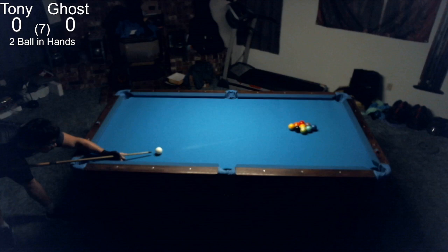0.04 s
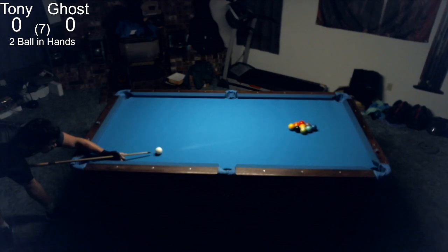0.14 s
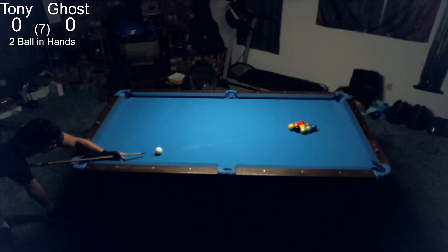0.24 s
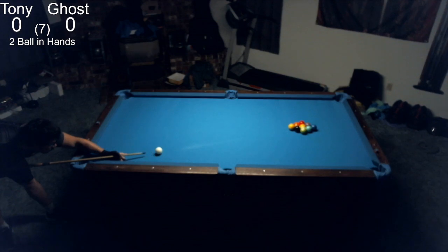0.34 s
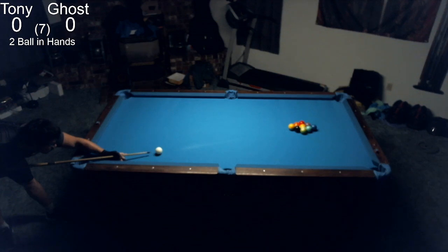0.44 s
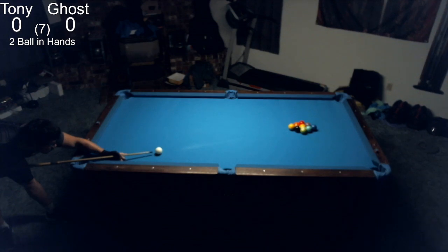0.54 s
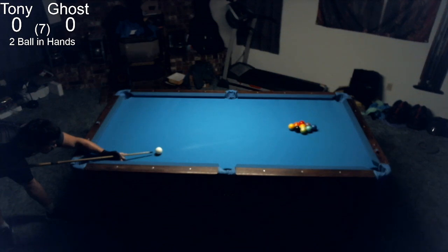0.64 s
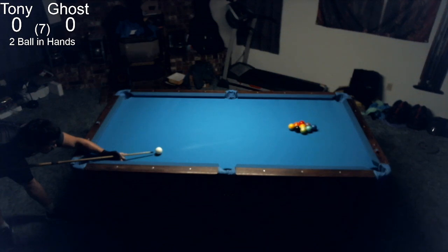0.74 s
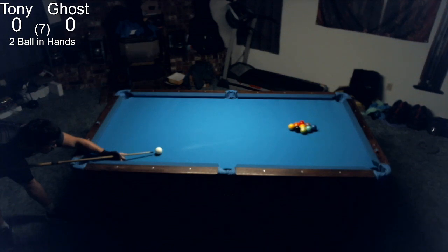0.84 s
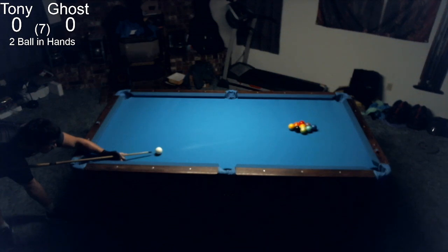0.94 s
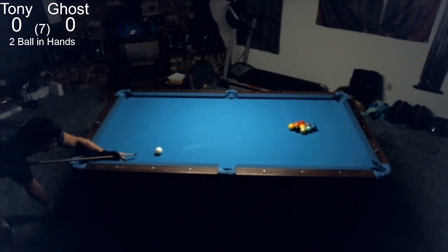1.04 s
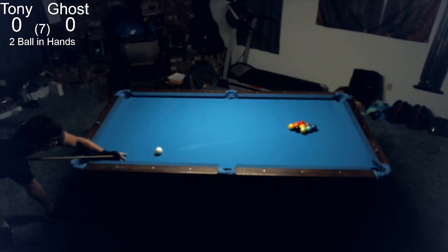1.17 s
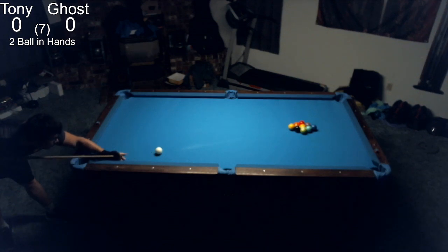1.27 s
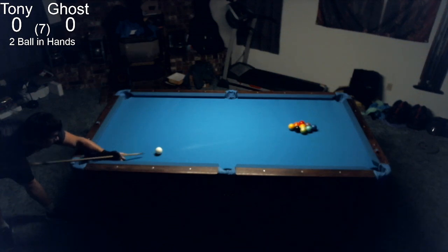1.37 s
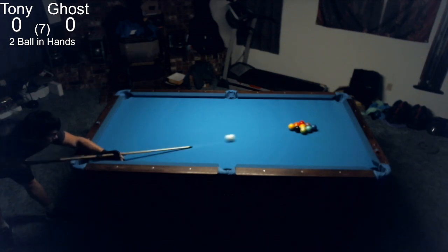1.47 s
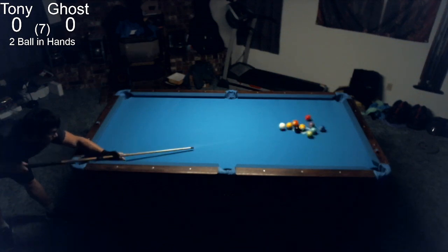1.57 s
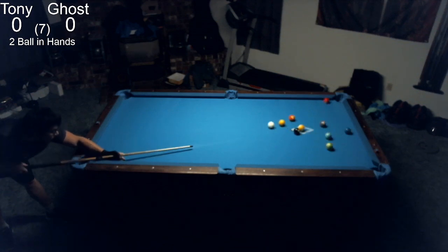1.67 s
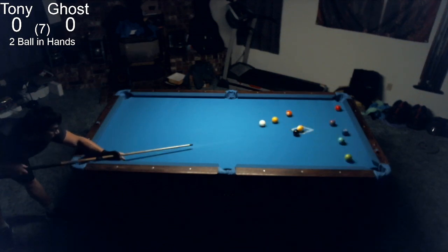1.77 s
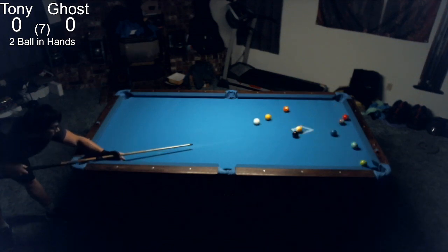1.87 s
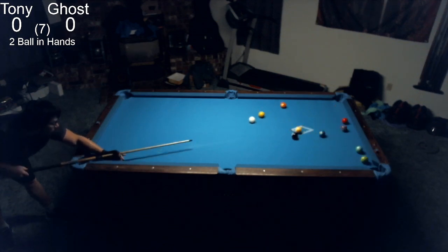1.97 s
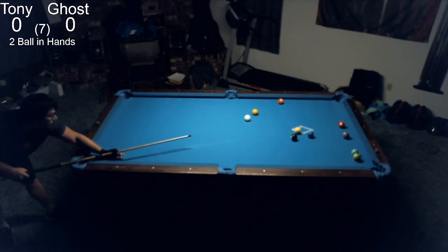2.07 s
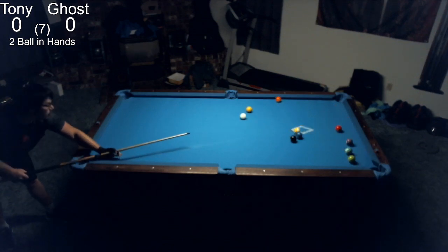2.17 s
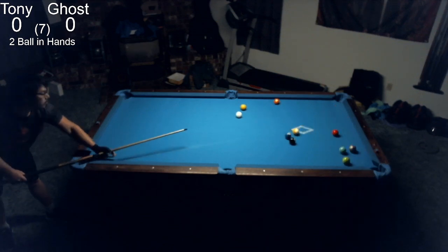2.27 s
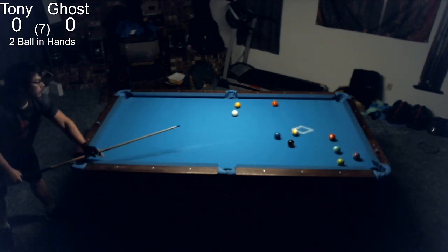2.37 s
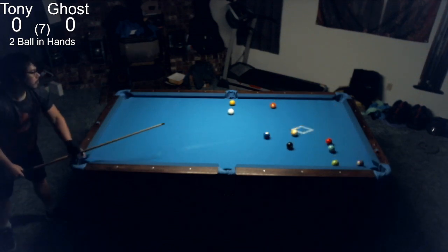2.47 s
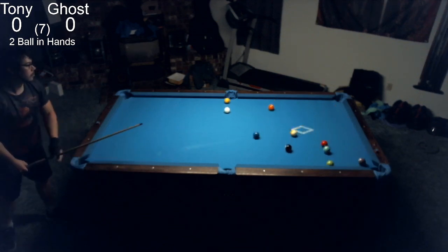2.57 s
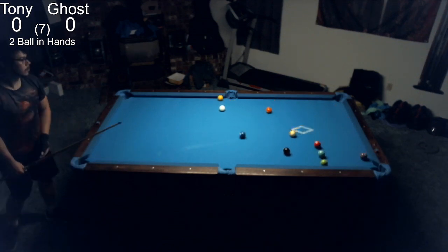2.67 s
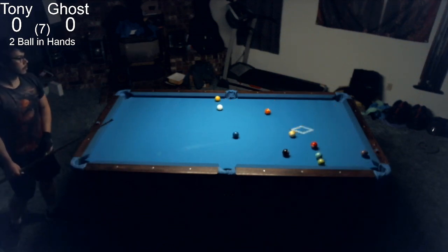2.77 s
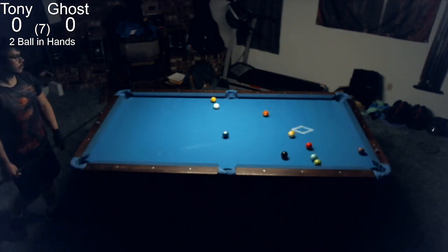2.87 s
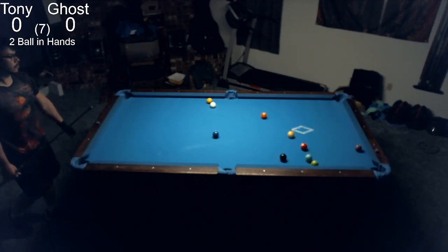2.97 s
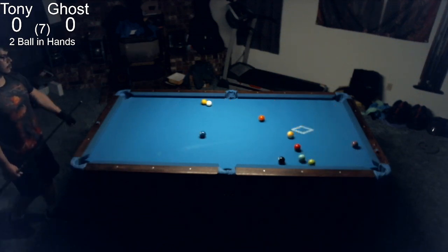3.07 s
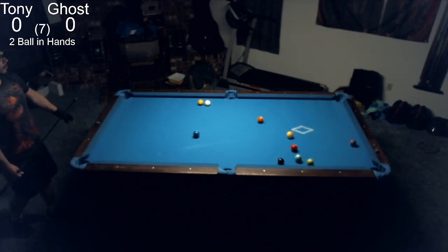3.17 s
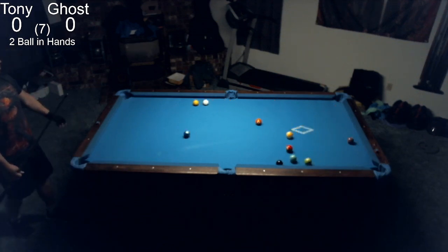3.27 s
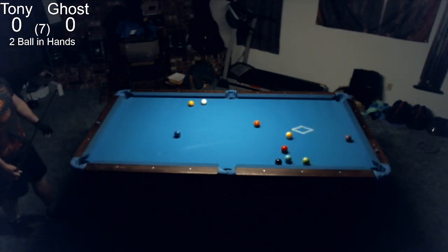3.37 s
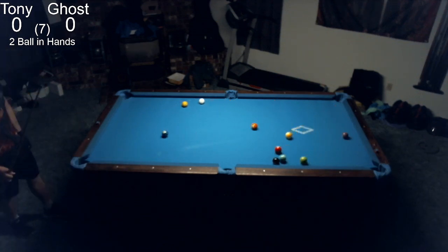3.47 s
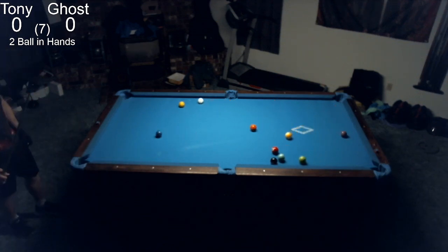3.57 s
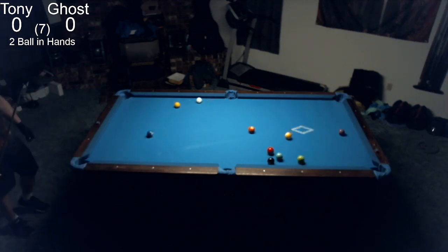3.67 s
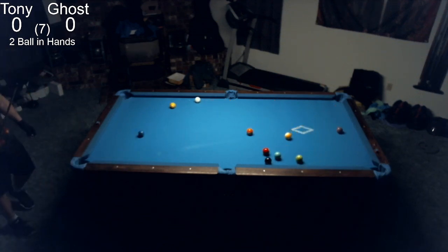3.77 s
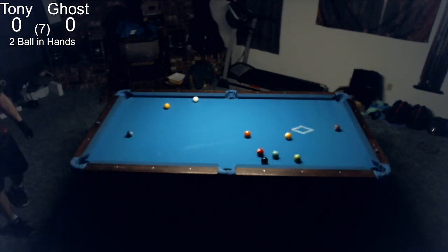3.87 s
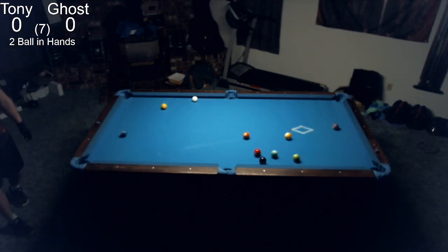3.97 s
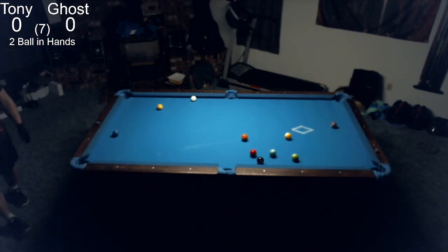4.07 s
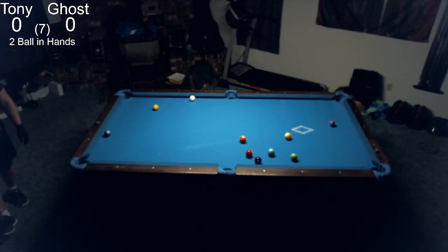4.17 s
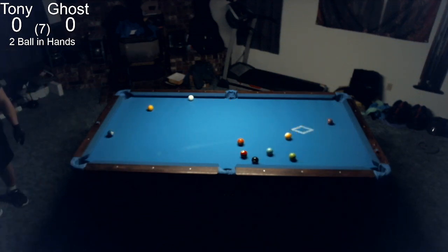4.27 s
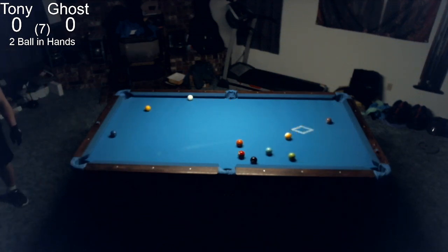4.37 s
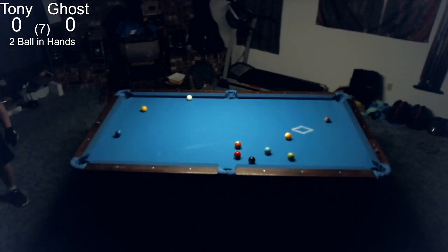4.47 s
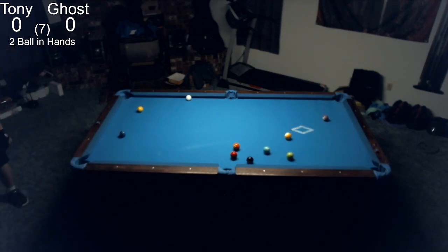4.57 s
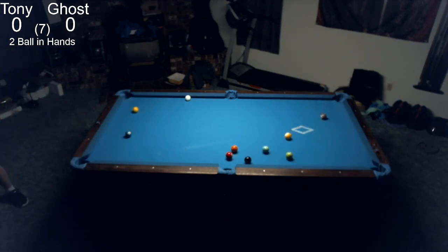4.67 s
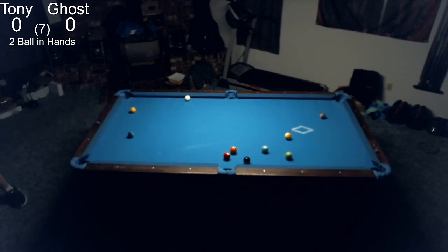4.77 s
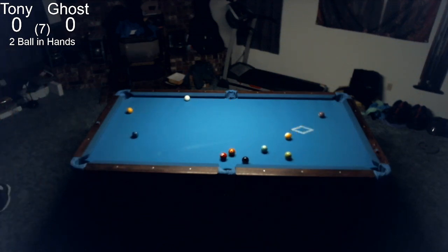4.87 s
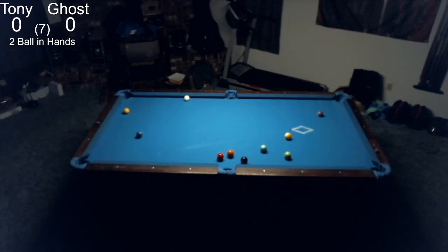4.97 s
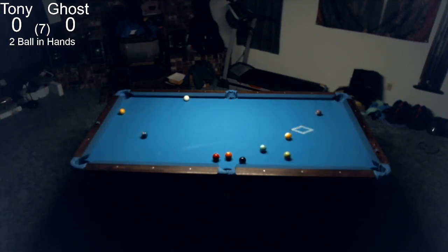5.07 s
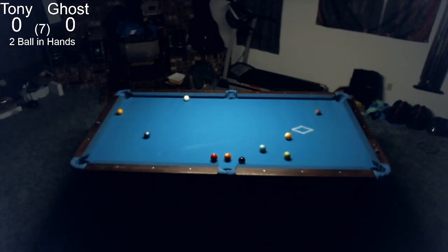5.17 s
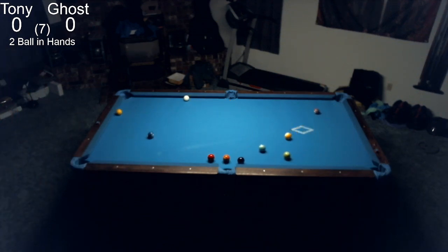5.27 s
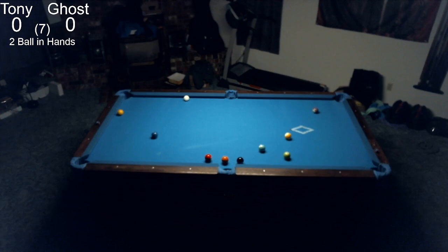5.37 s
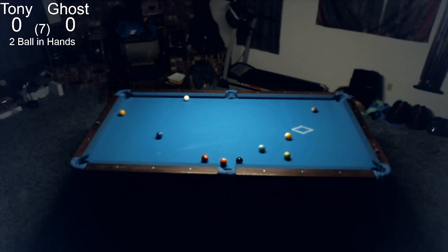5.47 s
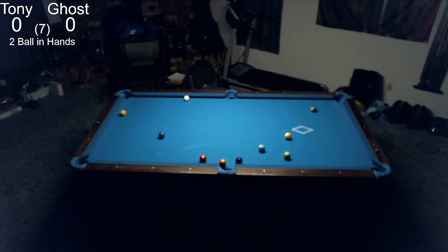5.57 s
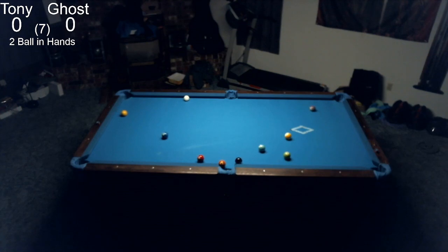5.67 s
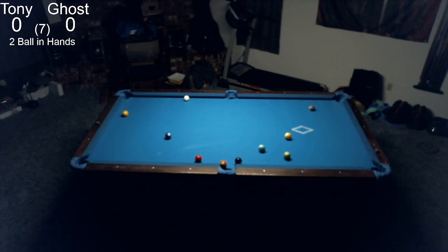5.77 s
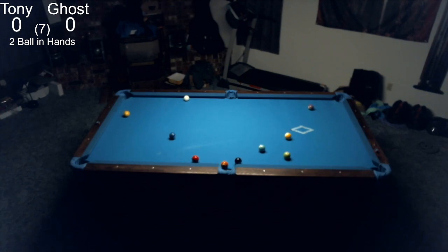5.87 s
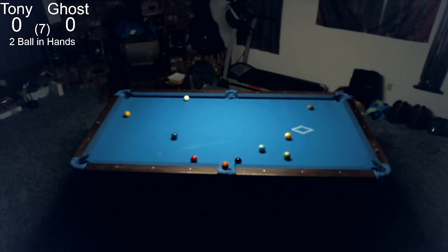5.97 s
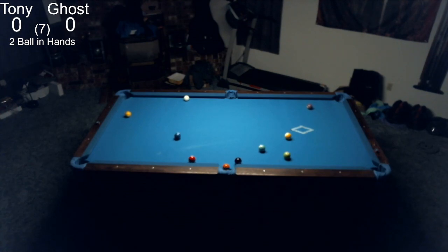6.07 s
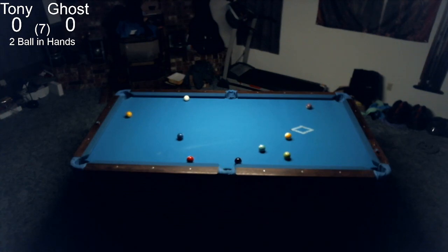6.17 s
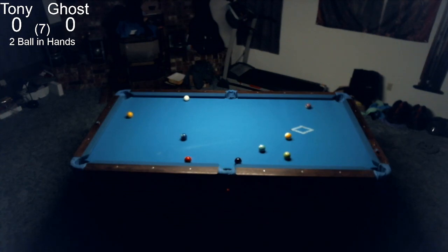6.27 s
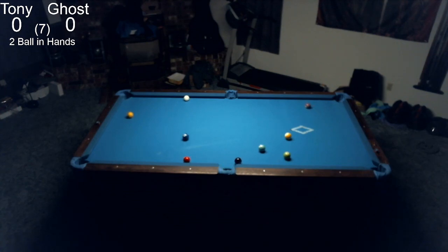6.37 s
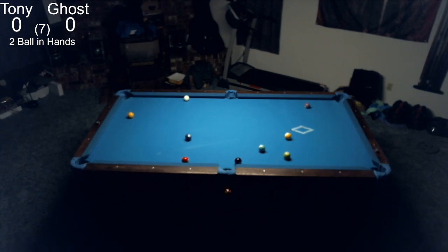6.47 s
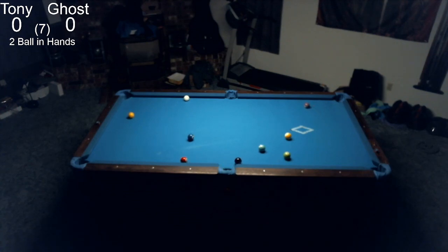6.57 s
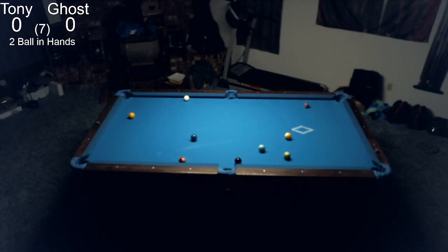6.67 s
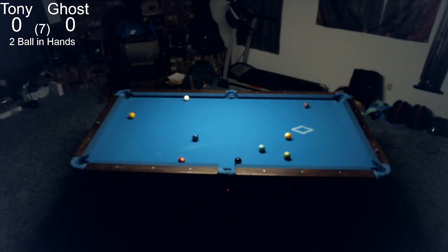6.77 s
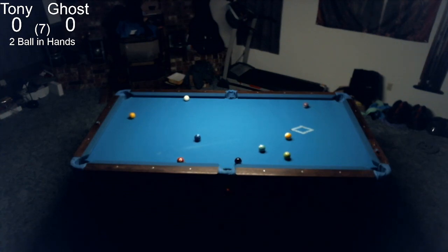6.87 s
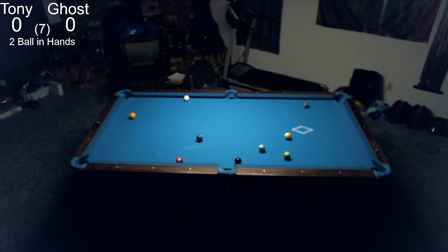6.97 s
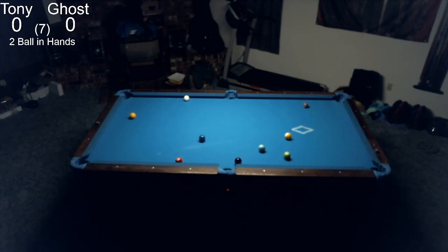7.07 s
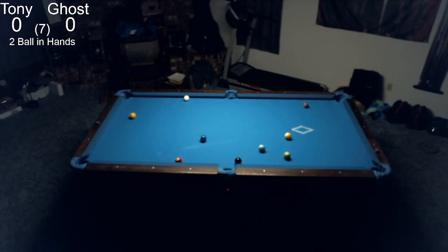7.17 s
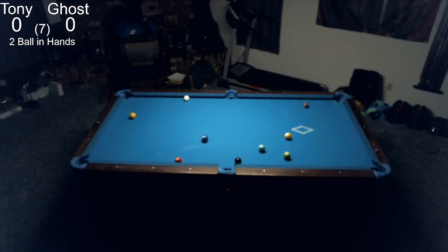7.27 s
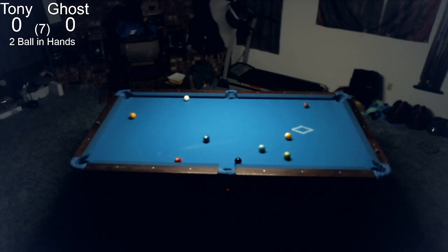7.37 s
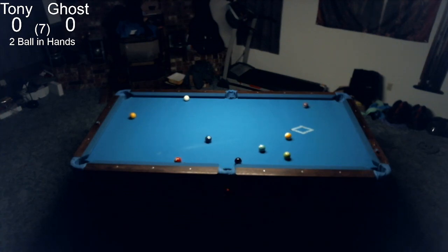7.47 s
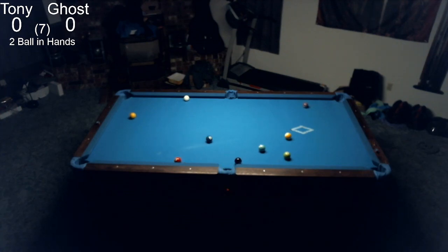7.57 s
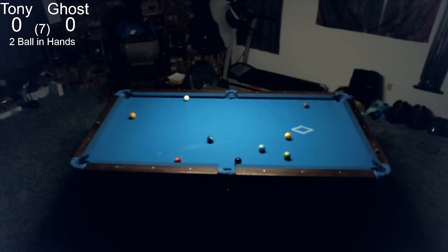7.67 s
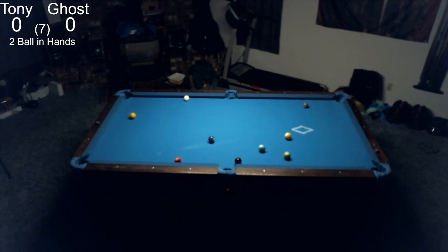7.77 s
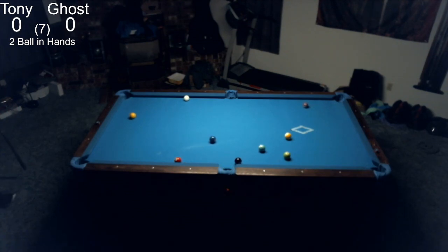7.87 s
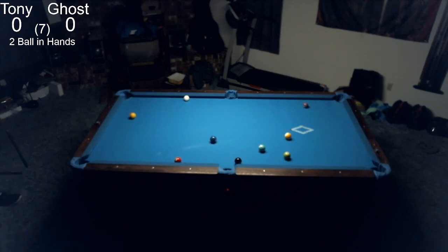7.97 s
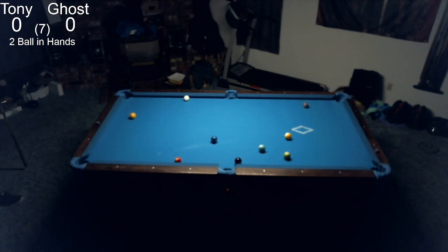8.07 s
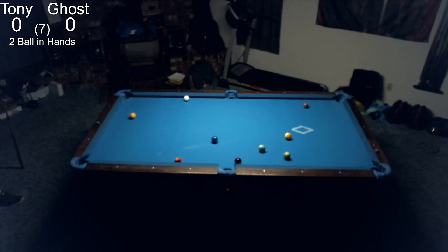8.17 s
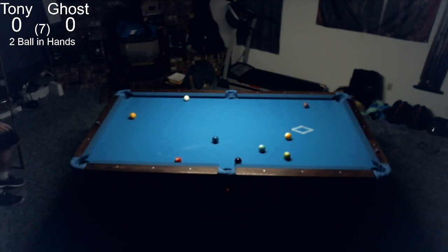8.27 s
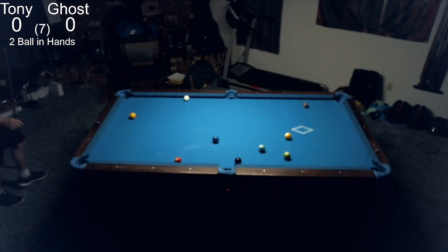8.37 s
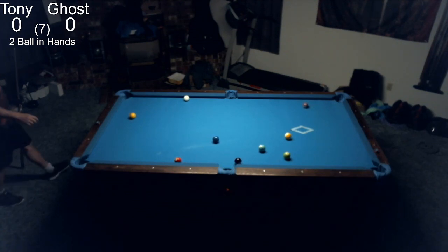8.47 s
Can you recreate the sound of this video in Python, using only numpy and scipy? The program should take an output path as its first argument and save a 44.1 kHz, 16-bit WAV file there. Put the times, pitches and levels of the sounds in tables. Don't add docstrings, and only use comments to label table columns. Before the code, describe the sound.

Faint mains hum and hiss in a quiet room, then a cue tip cracks on the ball with a brief shaft ring. An instant later the rack bursts, clipping the microphone, with a short slap off the walls. Cushions thud softly, ball clicks thin out, and after a pause one ball scrapes, rolls, knocks and rattles down into a pocket.

```python
import sys
import numpy as np
from scipy import signal
from scipy.fft import rfft, irfft, next_fast_len
from scipy.io import wavfile
from scipy.ndimage import uniform_filter1d

SR = 44100
rng = np.random.default_rng(int(sys.argv[2]) if len(sys.argv) > 2 else 0)


def unload_wav(signal):
    wavfile.write(
        sys.argv[1],
        SR,
        np.round(np.clip(np.atleast_2d(signal).T, -1, 1) * 32767).astype(np.int16),
    )


def linear_from_db(decibels):
    return 10 ** (np.asarray(decibels, float) / 20)


N = 375732

SIZE = 32768
HZ, T = np.fft.rfftfreq(SIZE, 1 / SR), np.arange(SIZE) / SR


def evened(x):
    return x / np.sqrt(np.mean(x ** 2) + 1e-20)


def read(points, hz):
    point_hz, value = np.transpose(points)
    return np.interp(np.log(hz + 1), np.log(point_hz + 1), value)


def coloured(x, points):
    hz = abs(np.fft.fftfreq(len(x), 1 / SR))
    log_gain = np.log(linear_from_db(read(points, hz)))
    response = np.exp(np.conj(signal.hilbert(log_gain)))
    return np.fft.ifft(np.fft.fft(x) * response).real


def add(mix, start_s, sound):
    fade = np.clip((T[-1] - T) / .1 - 1, 0, 1)
    part = mix[round(start_s * SR):][:len(sound)]
    part += (sound * fade)[:len(part)]


def pulse(hz, steep, fall=2):
    ratio = HZ / hz
    level = ratio ** steep * np.exp(-steep / fall * ratio ** fall)
    shape = -level * np.exp(-2j * np.pi * ratio * (1 + steep / 8))
    return shape / abs(irfft(shape, SIZE)).max()


# pitch_hz, time_to_fall_60_db_s
ROOM_DECAY = [(200, .5), (700, 0.39), (1500, .33), (3000, 0.3), (5000, .27), (7000, .22)]


def room(spectrum, slap_ms=22, slap=1.2, spread_ms=5, build_ms=3):
    taps = np.zeros(SIZE)
    at = np.arange(40, SIZE - 16, 16)
    taps[at + rng.integers(0, 16, len(at))] = rng.standard_normal(len(at))
    ms = T * 1000
    taps *= 1 - np.exp(-ms / build_ms)
    taps *= 1 + slap * np.exp(-((ms - slap_ms) / spread_ms) ** 2)
    reflections, tail = rfft(taps), 0
    for k, (_, t60) in enumerate(ROOM_DECAY):
        band = read([(hz, j == k) for j, (hz, _) in enumerate(ROOM_DECAY)], HZ)
        tail = tail + irfft(reflections * band, SIZE) * linear_from_db(-60 * T / t60)
    return irfft(rfft(tail / np.linalg.norm(tail)) * spectrum, SIZE)


def heard(spectrum, room_db, slap_ms, slap=0.6867):
    slate_db, slate_ms, small_hz = -2, 2.0924, 780
    spectrum = spectrum / (1 + (small_hz / (HZ + 1)) ** 7)
    slate_echo = linear_from_db(slate_db) * np.exp(-2j * np.pi * HZ * slate_ms / 1000)
    return irfft(spectrum * (1 + slate_echo), SIZE) + linear_from_db(room_db) * room(spectrum, slap_ms, slap)


# multiple_of_mains, rms_level_db
HUM_OVERTONES = [(1, -69), (2, -91.5), (3, -98.5), (4, -98), (5.15, -94.5), (7, -93), (9, -92), (10, -102),
                 (11, -92.5), (13, -100), (21, -99), (23, -105), (33, -103)]
# pitch_hz, level_db
HISS_COLOUR = [(30, -5.5), (90, -1), (200, -4), (330, 1.5), (400, -5), (1100, -5), (2500, -11.5),
               (5000, -10), (6500, -15.5)]


def hum_and_hiss():
    mains_hz, hiss_db = 60, -80
    t = np.arange(N) / SR
    hum = np.zeros(N)
    for multiple, db in HUM_OVERTONES:
        turns = multiple * mains_hz * t + rng.random() / (2 * np.pi)
        hum += np.sqrt(2) * linear_from_db(db) * np.sin(2 * np.pi * turns)
    hiss = evened(coloured(rng.standard_normal(next_fast_len(N)), HISS_COLOUR))[:N]
    return hum + linear_from_db(hiss_db) * hiss


def thud(db, hz, room_db):
    push = linear_from_db(db) * pulse(hz, 4.54)
    return irfft(push, SIZE) + linear_from_db(room_db) * room(push, 35, .3)


# start_s, peak_level_db, pitch_hz
CUSHION_THUDS = [(1.412, -26.5, 426), (1.668, -28, 470), (1.699, -39.5, 228), (1.706, -28.5, 704),
                 (1.735, -37.5, 132), (1.742, -47, 404), (1.769, -42, 249), (1.849, -67, 302),
                 (1.969, -59.5, 303.6), (6.094, -48, 302.2), (6.115, -57.5, 170), (6.313, -53, 226.5),
                 (6.325, -56.5, 99), (6.62, -64.5, 298.2), (8.219, -76, 40)]


def cushion_thuds(mix):
    for start_s, db, hz in CUSHION_THUDS:
        add(mix, start_s, thud(db, hz, room_db=-4))


# pitch_hz, level_db
CRACK_COLOUR = [(90, -49), (220, -31), (450, -15), (780, -4.5), (1150, -13), (1500, -9.5), (2000, -14),
                (2700, -4), (3500, -5.5), (4500, -4), (5600, -9.5), (7000, -17.5)]
# pitch_hz, level_db, time_to_fall_60_db_s
SHAFT_TONES = [(1682, -2.5, .09), (2814.3, -6, 0.35), (2905.5, -3, .3), (3340, -11.5, .15),
               (4460, 0.5, 0.14), (4511, -3, .3), (4620, -8.5, .3), (5580, -3.5, .3), (5718, -7.5, .12)]


def cue():
    crack_db, ring_db = -5.5, -23
    crack_room_db, ring_room_db = -2, -4.5
    swell = 1 - np.exp(-T / 0.00089)
    chatter = rng.standard_normal(SIZE) * swell * np.exp(-(T / 0.0082) ** 2.5)
    crack = coloured(chatter, CRACK_COLOUR)
    crack = linear_from_db(crack_db) * crack / abs(crack).max()
    ring = np.zeros(SIZE)
    for hz, db, t60 in SHAFT_TONES:
        ring += linear_from_db(ring_db + db - 60 * T / t60) * np.sin(2 * np.pi * hz * T)
    to_room = linear_from_db(crack_room_db) * crack + linear_from_db(ring_room_db) * ring
    return crack + ring + room(rfft(to_room), 46, 0.13)


# pitch_hz, level_db
RACK_TONE = [(180, -62), (300, -32), (896, -16), (1080, -7), (1560, -7), (1690, -3), (2780, -1),
             (5170, -22.5), (7000, -42), (9100, -74.5), (15400, -120)]


def rack_room():
    spread_ms, level_db = 2.512, 17.3
    wander = evened(uniform_filter1d(rng.standard_normal(SIZE), size=250))[:len(HZ)]
    late_s = spread_ms / 1000 * (1.4 + np.tanh(wander))
    burst = linear_from_db(read(RACK_TONE, HZ)) * np.exp(-2j * np.pi * HZ[1] * np.cumsum(late_s))
    burst = burst / np.linalg.norm(irfft(burst, SIZE))
    return linear_from_db(level_db) * room(burst, 22.005, 1.093, 5.4, 9.6)


def rack_wave(db, first_hz, last_hz, ms):
    contacts_hz = np.interp(T, [0, ms / 1000], [first_hz, last_hz])
    turns = np.cumsum(contacts_hz) / SR
    contacts = np.diff(np.floor(turns), prepend=-1)
    contacts = contacts * np.clip((ms - T * 1000) / 1.0, 0, 1)
    return linear_from_db(db) * irfft(rfft(contacts) * pulse(2700, 4.2), SIZE)


# start_s, level_db, first_contacts_per_s, last_contacts_per_s, length_ms
RACK_WAVES = [
    (1.5669, 5.5, 3170, 2400, 2.9),
    (1.5705, 3.5, 2450, 2700, 3.2509),
    (1.575, -7.5, 2900, 2900, 2.2),
]


def rack_burst(mix):
    add(mix, RACK_WAVES[0][0], rack_room())
    for start_s, *wave in RACK_WAVES:
        add(mix, start_s, rack_wave(*wave))


# start_s, peak_level_db, pitch_hz
TABLE_BOOMS = [
    (1.567, -48.5, 451),
    (1.597, -49.5, 210.1),
    (1.799, -67, 219),
    (1.894, -64.5, 192),
]


def table_booms(mix):
    for start_s, db, hz in TABLE_BOOMS:
        add(mix, start_s, thud(db, hz, room_db=12))


# start_s, peak_level_db, pitch_hz, room_db, wall_echo_ms
BALL_CLICKS = [
    (1.9155, -13.5, 2650, 3, 17),
    (2.098, -27.5, 2358, 5.5, 16.7),
    (2.240, -43, 2200, 4, 13.6),
    (2.555, -31, 2465, 8.5, 21.6),
    (2.861, -39, 2270, 8, 22),
    (3.106, -43.5, 1980, 6.5, 33.5),
    (3.499, -35, 2100, 3.5, 34),
]


def ball_clicks(mix):
    for start_s, db, hz, room_db, slap_ms in BALL_CLICKS:
        lobes = pulse(hz, 1.38, 6.03) + linear_from_db(-37.5) * pulse(2.05 * hz, 30.31)
        add(mix, start_s, heard(linear_from_db(db) * lobes, room_db, slap_ms))


def rings(tones):
    return sum(linear_from_db(db) / (1 + 2j * (HZ - hz) / width) for hz, width, db in tones)


# pitch_hz, width_hz, level_db
SHELL_TONES = [(1000, 320, -8), (1368.4, 130, -5), (2480, 81.227, -5.5), (2685, 250, 1), (3460, 120, -7),
               (4436.6, 43, -19)]
# pitch_hz, width_hz, level_db
RIM_TONES = [(5310, 29, 0), (5560, 63, -12), (5560, 79, -1.5), (6000, 110, -8), (6080, 170, -5)]


def knock(db, hz, shell_db, rim_db, room_db):
    ring_db = 9
    shell = linear_from_db(ring_db + shell_db) * rings(SHELL_TONES)
    rim = linear_from_db(ring_db + rim_db) * rings(RIM_TONES)
    blow = linear_from_db(db) * pulse(hz, 1.9, 1.9834)
    return heard(blow * (1 + shell + rim), room_db, 37.5, 0.1)


# start_s, peak_level_db, blow_pitch_hz, ring_db
LINING_KNOCKS = [
    (5.233, -37, 4470, 2),
    (6.094, -38.5, 3360, 8),
    (6.170, -49.5, 3418, 0.1),
    (6.727, -24, 2900, -2),
    (6.7315, -30.5, 2020, -12),
    (6.204, -50.5, 2359, 5),
    (6.616, -56, 1102, 15.5),
    (6.889, -46, 2400, 0),
    (8.057, -71, 2400, 0.1),
]
RIM_KNOCKS = [
    (5.289, -69, 4490, 15),
    (5.297, -61, 3058, -2),
    (5.915, -64.5, 4000, -5),
    (6.281, -29.5, 3538, -1.5),
    (6.483, -42.5, 3547, 6.5),
    (6.889, -67.5, 5000, 6),
]
SHELL_KNOCKS = [
    (4.746, -60, 2400, -2),
    (5.925, -70, 1300, 6),
    (6.100, -50, 1602, 1),
    (6.897, -60, 916.7, -7),
]


def pocket_knocks(mix):
    parts = [  # knocks, shell ring dB, rim ring dB, room dB
        (LINING_KNOCKS, -10.5, -10.5, -3.5),
        (RIM_KNOCKS, -2.5, 7, 9.5),
        (SHELL_KNOCKS, 2.5, -1.5, 2)]
    for knocks, shell_db, rim_db, room_db in parts:
        for start_s, db, hz, ring_db in knocks:
            add(mix, start_s, knock(db, hz, shell_db + ring_db, rim_db + ring_db, room_db))


def scuff(stroke, colour):
    s, db = np.transpose(stroke)
    grit = rng.standard_normal(SIZE) * linear_from_db(2.4 * rng.exponential(1, SIZE))
    loudness = linear_from_db(np.interp(T + s[0], s, db, right=-140))
    dry_scuff = evened(coloured(grit, colour)) * loudness
    return dry_scuff + linear_from_db(-10) * room(rfft(dry_scuff))


# pitch_hz, level_db
SCRAPE_COLOUR = [(350, -58), (600, -16), (929, 4), (1230, -3), (3700, -2), (5270, -0.5), (6560, -13.5),
                 (7200, -22), (9360, -46), (15800, -120)]
# peak_s, peak_level_db
SCRAPE_PEAKS = [
    (5.226, -52.5),
    (5.289, -62),
]


def scrapes(mix):
    rise_s, fade_s = 0.012, 0.053
    for peak_s, db in SCRAPE_PEAKS:
        stroke = [(peak_s - rise_s, db - 18), (peak_s, db), (peak_s + fade_s, db - 18.5)]
        add(mix, peak_s - rise_s, scuff(stroke, SCRAPE_COLOUR))


# pitch_hz, level_db
ROLLING_COLOUR = [(500, -36), (850, -1), (1200, 12), (1500, -13), (3000, 2.5), (6500, -23)]


def roll(mix):
    start_s, length_s = 5.68, .41
    level_db, swell_db = -90.5, 9
    wobbles, wobble_db = 2.3, 4
    u = np.linspace(0, 1, num=40)
    db = level_db + swell_db * u + wobble_db * np.sin(2 * np.pi * wobbles * u)
    add(mix, start_s, scuff(np.c_[start_s + length_s * u, db], ROLLING_COLOUR))


def scene():
    mix = np.zeros(N)
    add(mix, 1.4127, cue())
    rack_burst(mix)
    scrapes(mix)
    roll(mix)
    ball_clicks(mix)
    pocket_knocks(mix)
    cushion_thuds(mix)
    table_booms(mix)
    return mix[None]


def top_cut(x):
    return signal.sosfilt(signal.butter(12, 15000, fs=SR, output="sos"), x)


# pitch_hz, level_db
MIC_COLOUR = [(30, -36), (90, -14.5), (180, -5.5), (400, 0.5)]
# pitch_hz, level_db
BAND_LIMIT = [(20, 0), (6700, -0.5), (7000, -5), (7500, -25), (8000, -46), (8500, -70)]


def record(dry):
    rate_hz = 16000
    overloaded = np.clip(dry[0], -.68, .68)
    spare = (0, next_fast_len(N) - N)
    picked_up = coloured(np.pad(overloaded, spare), MIC_COLOUR)
    narrow = coloured(picked_up + np.pad(hum_and_hiss(), spare), BAND_LIMIT)
    image = narrow * np.cos(2 * np.pi * rate_hz * np.arange(len(narrow)) / SR)
    image_colour = [(8500, -110), (10000, -55.5), (13000, -50), (14400, -48), (15000, -71.5), (16000, -120)]
    image = coloured(image, image_colour)
    return top_cut((narrow + image)[None, :N])


dry = scene()
out = record(dry)
unload_wav(out)
```